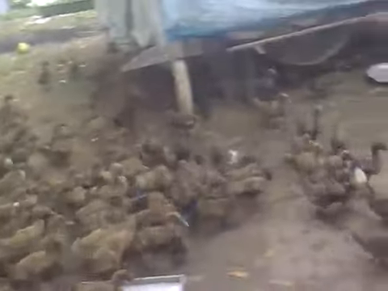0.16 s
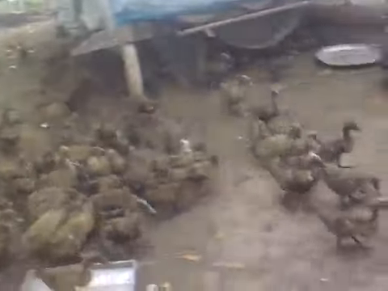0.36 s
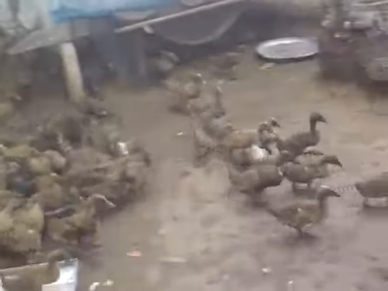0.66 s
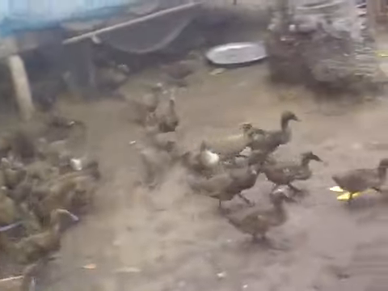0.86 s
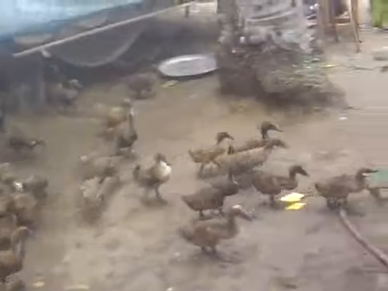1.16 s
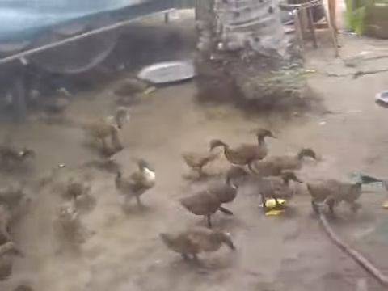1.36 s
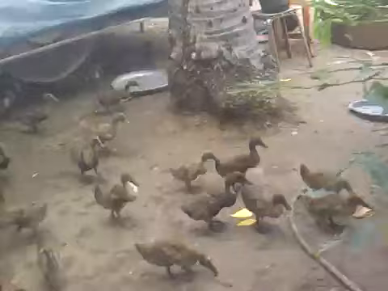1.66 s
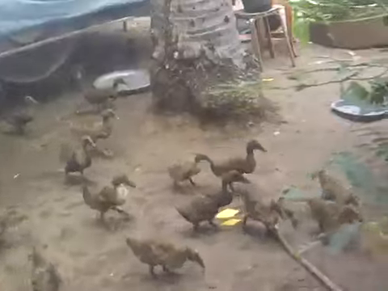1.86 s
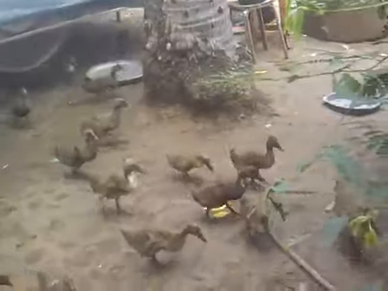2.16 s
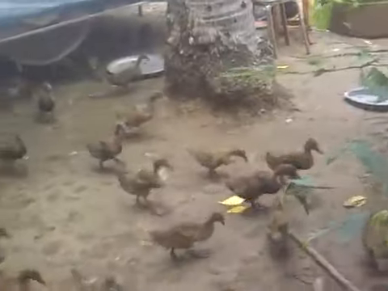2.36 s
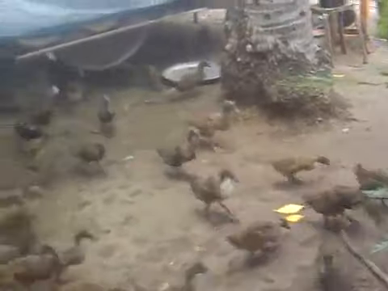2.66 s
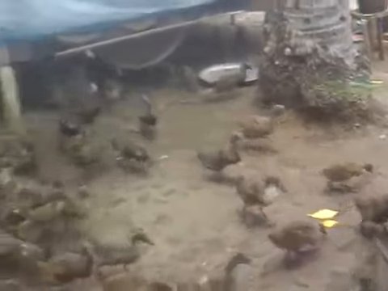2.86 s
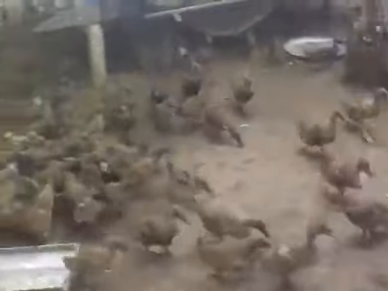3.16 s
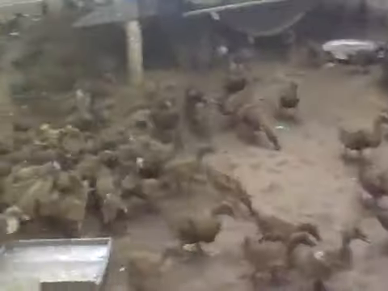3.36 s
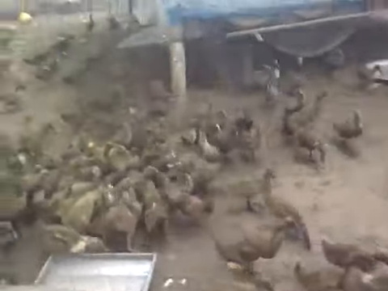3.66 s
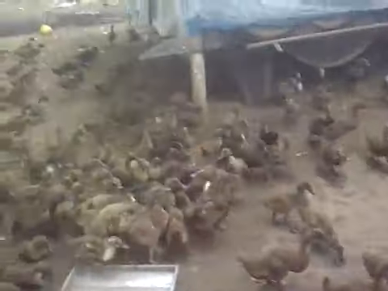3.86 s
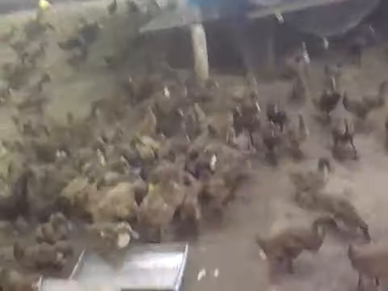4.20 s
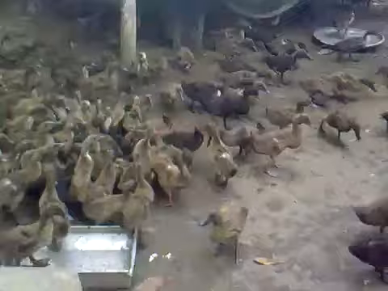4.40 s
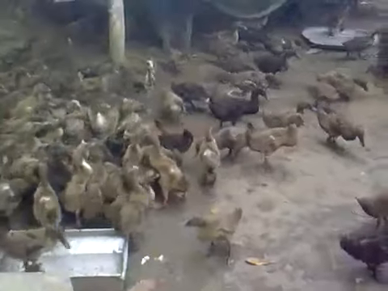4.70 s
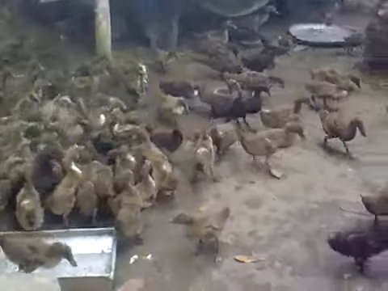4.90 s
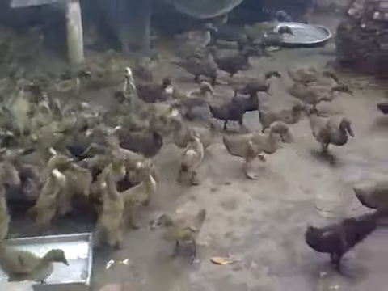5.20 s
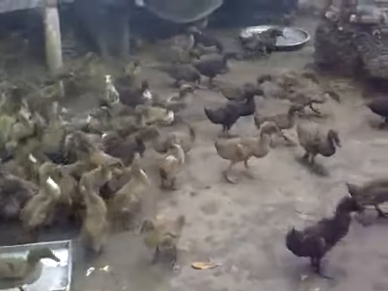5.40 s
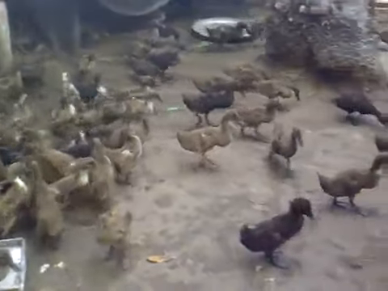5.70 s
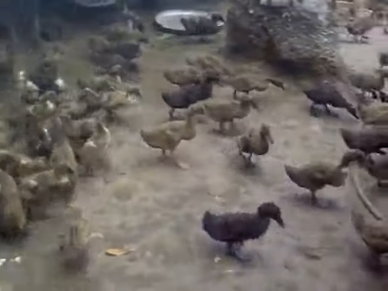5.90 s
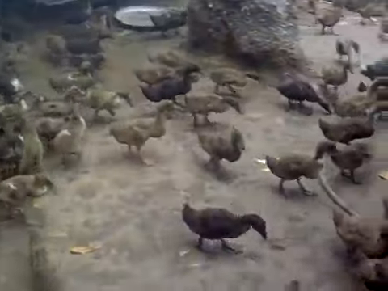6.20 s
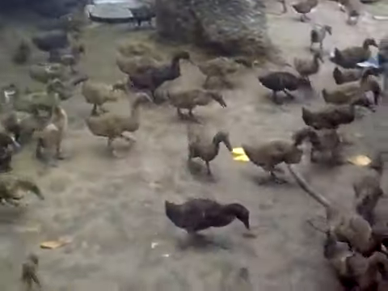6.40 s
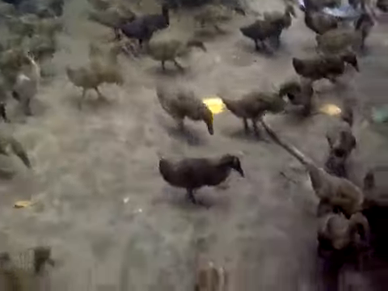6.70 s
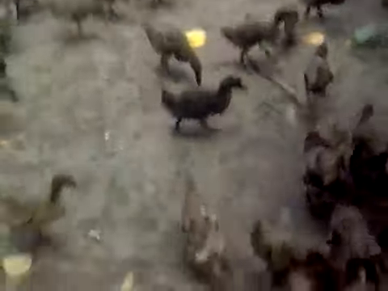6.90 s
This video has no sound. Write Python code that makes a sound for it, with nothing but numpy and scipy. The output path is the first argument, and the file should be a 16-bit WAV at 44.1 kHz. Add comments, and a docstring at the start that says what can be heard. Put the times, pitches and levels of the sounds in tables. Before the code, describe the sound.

Outdoors in a farmyard, a small microphone sits amid many ducklings peeping without pause, thin and reedy, around the upper-middle pitch range. Loud single peeps jump out, strongest between two and four seconds, with dull thumps on trays. The sound stutters, drops to nothing for an instant, and resumes softer and slightly thinner, with scattered peeps, bill ticks and one sharp clack past six seconds. Faint low rumble and yard noise underneath.

```python
"""A flock of young ducks crowds a farmyard, whistling short, mostly falling peeps near a small microphone.
The nearest peeps are placed one by one as reedy sines; a dense chorus of random ones lies behind them.
A soft broadband hiss rises and falls with their level; feet and bills tap trays and ground as short rings
of filtered noise. Echoes, yard noise, a low rumble and one brief rustle lie around them.
Midway the sound stutters, stops dead for about a fifth of a second and resumes with a quieter chorus."""
import sys
import numpy as np
from scipy import signal
from scipy.io import wavfile
from scipy.ndimage import uniform_filter1d

SR = 44100
rng = np.random.default_rng(int(sys.argv[2]) if len(sys.argv) > 2 else 0)


def materialize(psi):
    """Save the field psi as 16-bit PCM at rate SR to the path in sys.argv[1].

    A 1-D psi becomes a single channel; in a 2-D psi each row is a channel.
    """
    bounded = np.clip(np.atleast_2d(psi).T, -1, 1)
    quanta = np.round(bounded * 32767).astype(np.int16)
    wavfile.write(sys.argv[1], SR, quanta)


N = 310905
TIME = np.arange(N) / SR  # seconds

# The stutter and stop of the whole sound. Each row: time in seconds, gain in dB.
STOP = [(4.005, 0), (4.007, -24), (4.011, -24), (4.012, -10), (4.016, -10), (4.017, -26), (4.05, -70),
        (4.06, -120), (4.2295, -120), (4.2305, 0)]
RESUME_S = STOP[-1][0]

# Every pair of settings marked "before, after" holds one value for each side of the stop.
BILL_SCALE = 0.99, 0.858  # factor on the bill resonances: before, after


def gain_of(db):
    """Decibels to gain."""
    return 10 ** (np.asarray(db) / 20)


def evened(x):
    """Scales to rms 1."""
    return x / np.sqrt(np.mean(x ** 2) + 1e-20)


def add(mix, s, sound):
    """Mixes a sound in at time s, trimmed to the length of the mix."""
    at = round(s * SR)
    sound = sound[max(-at, 0):]
    part = mix[max(at, 0):][:len(sound)]
    part += sound[:len(part)]


def band(x, lo_hz, hi_hz):
    """Band-pass."""
    sos = signal.butter(2, [lo_hz, min(hi_hz, SR / 2 - 99)], "bandpass", fs=SR, output="sos")
    return signal.sosfilt(sos, x)


def wander(count, size):
    """Smooth random curves of rms 1."""
    window = np.hanning(420)
    return [evened(signal.oaconvolve(v, window, "same")) for v in rng.standard_normal((count, size))]


def peep(ms, start_hz, mid_hz, end_hz, db, hoarse, reedy_db=0, bill_scale=1):
    """A syrinx whistle: near sine on an arched pitch that sags as the breath runs out."""
    # Throat and bill resonances that let out the second and third harmonic.
    # Each row: centre in Hz before scaling, width in Hz.
    resonances = [(5450, 1220), (7300, 3300)]
    overtones_db = -21.5, -33  # second, third harmonic, before reediness and resonance
    overtone_spread_db = 2.8  # from peep to peep
    wobble_share, flutter_db, rasp_db = .007, 2.0, 4.0  # rms unsteadiness of pitch, level, overtones

    u = np.linspace(-.12, 1.15, int(1.27 * ms * SR / 1000))  # share of the length, with lead-in and tail
    arch = np.polyval(np.polyfit([0, .5, 1], [start_hz, mid_hz, end_hz], deg=2), np.minimum(u, 1))
    hz = arch - 2500 * np.maximum(u - 1, 0)
    wobble, flutter, rasp = wander(count=3, size=len(u))
    cycles = np.cumsum(hz * (1 + wobble_share * wobble)) / SR
    phase = 2 * np.pi * (cycles + rng.random())

    spread_db = overtone_spread_db * rng.standard_normal(2)
    strengths = gain_of(np.add(overtones_db, reedy_db + spread_db))
    overtones = 0
    for strength, k, (centre_hz, width_hz) in zip(strengths, (2, 3), resonances):
        passed = np.exp(-((k * hz - bill_scale * centre_hz) / width_hz) ** 2)
        overtones = overtones + strength * passed * np.sin(k * phase)
    tone = np.sin(phase) + gain_of(rasp_db * rasp) * overtones

    swell = np.sin(np.pi * np.linspace(0, 1, len(u)) ** 1.03) ** 0.64  # peaks just past the middle
    rough = np.convolve(rng.standard_normal(len(u)), np.hanning(80), "same")
    grain = 1 + hoarse * evened(rough)
    level = np.sqrt(2 / (1 + hoarse ** 2)) * gain_of(db + flutter_db * flutter)
    return level * swell * grain * tone


def near_ducks():
    """The peeps close to the microphone; soft and high ones are the reediest, low ones the hoarsest."""
    # Each row: start in seconds, length in ms, pitch in Hz at the middle,
    # downward slide in % of the pitch (negative rises), level in dB.
    near_peeps = [(0.0, 22.3, 2576, 1, -24), (0.138, 24.5, 2448, 8.5, -19.5), (0.367, 57, 2320, 16, -28.5),
                  (0.566, 82, 2567, 12.5, -35), (0.679, 49, 2490, -3, -26.5), (0.71, 45, 3386, 18, -41),
                  (0.781, 80, 2645, 2.5, -37), (0.835, 43, 2880, 6, -40), (0.917, 17.5, 2676, 5, -26),
                  (0.934, 75, 2392, 16.5, -17.5), (1.02, 53, 2683, -5, -32.5),
                  (1.058, 75, 2836, 5.5, -37.5), (1.157, 17, 1240, 36, -40.5), (1.184, 40, 2550, 13.5, -31),
                  (1.22, 31, 3310, 18.5, -39), (1.239, 55, 2310, 5.5, -17), (1.304, 59, 2540, 5, -24.5),
                  (1.316, 24, 1170, 41, -42), (1.374, 79, 2800, 5.5, -34), (1.455, 46, 3060, -10, -40.5),
                  (1.474, 60, 1863, 2, -39.5), (1.564, 72, 2690, -5.5, -28), (1.756, 32, 2630, 14, -39),
                  (1.778, 54, 2046, 8, -19), (1.865, 28, 2250, 9, -40), (1.912, 16, 3600, 30, -45),
                  (1.955, 33, 3570, 59, -48), (1.962, 39, 2620, 12.5, -30), (2.061, 63, 2276, 12.5, -29),
                  (2.07, 51, 2760, -0.5, -32), (2.126, 22.5, 2664, 10, -26.5), (2.156, 23, 1167, 27, -36.5),
                  (2.211, 25, 2310, -1.5, -36), (2.251, 22, 2160, 4, -26.5), (2.281, 85, 1960, 6.5, -34),
                  (2.316, 42, 2390, 11, -10.5), (2.343, 26, 2553, 6, -21.5), (2.37, 14.8, 1137, 39, -33.5),
                  (2.373, 77, 2396, -10.5, -22.5), (2.49, 100, 2307, 11, -26.5),
                  (2.617, 27.4, 1430, 18, -36.5), (2.722, 59, 2300, 2, -15), (2.792, 45, 2480, -5, -25.5),
                  (2.812, 70, 1920, 3.5, -26), (2.84, 37, 2320, 1.5, -27), (2.973, 43.3, 2507, 12.5, -13),
                  (3.033, 48, 2126, -1, -30), (3.091, 88, 2085, 9, -20.5), (3.112, 25, 2460, 6.5, -23.5),
                  (3.243, 115, 2634, 3.5, -30), (3.377, 54, 2398, 10, -26), (3.452, 50, 2416, 1, -15.5),
                  (3.446, 74, 2056, 8, -22), (3.447, 150, 2600, 38, -27.5), (3.683, 61, 2610, 6, -23),
                  (3.747, 15, 2330, 5, -24), (3.787, 40, 2440, 14, -28), (3.95, 103, 2572, 14.5, -20),
                  (3.99, 14, 2472, 9, -14), (4.228, 46, 2230, 16.5, -35), (4.229, 39, 2590, 0.5, -42.5),
                  (4.231, 26, 3500, 11.5, -52.5), (4.35, 56, 2463, 20.5, -33), (4.45, 73, 1987, 9, -33),
                  (4.481, 66, 2835, 10.5, -41), (4.53, 42, 2410, 28, -43.5), (4.612, 56, 2238, 23.5, -31),
                  (4.641, 43, 2616, 6, -34.5), (4.711, 61, 2404, 10.5, -36), (4.775, 59, 2220, -2, -36.5),
                  (4.897, 57, 2300, 20, -36), (4.997, 65, 1973, 1.5, -28), (5.049, 52, 2550, 9.5, -37),
                  (5.297, 68, 2112, 2.5, -24.5), (5.328, 67, 2430, 5, -36), (5.66, 83, 2000, 2.5, -39.5),
                  (5.71, 40, 2350, 3.5, -38.5), (5.926, 35, 2280, 17.5, -24.5),
                  (6.065, 20, 2324, -3.5, -28), (6.164, 42.5, 2520, 9, -29.5), (6.2, 58, 2166, 12, -27.5),
                  (6.314, 60, 2885, 10.5, -42.5), (6.318, 50, 2175, 1, -37), (6.425, 26, 2243, 8.5, -35.5),
                  (6.508, 56, 2415, 20.5, -25.5), (6.612, 43, 2380, 9, -27.5),
                  (6.661, 18.7, 2076, 10.5, -23), (6.666, 48, 1380, 1.5, -39.5),
                  (6.681, 41, 2390, 6.5, -28.5), (6.689, 54, 2030, 3.5, -26.5),
                  (6.766, 19.4, 2790, 23, -36), (6.797, 32, 2450, 17, -26), (6.89, 59, 2850, 6, -44),
                  (6.892, 38, 2470, 7, -56), (6.893, 62, 1437, 32.5, -42.5), (6.95, 38, 2390, 3, -42),
                  (7.011, 21.2, 2230, 4.5, -24.5), (7.02, 42, 3080, -5, -40)]
    early_slide = 0.332  # share of the slide spent before the middle of a peep
    hoarse_usual, hoarse_low, low_hz = .08, .4, 1300  # share of grain, and below low_hz
    side_reedy_db = -1.5, 2  # overtone lift before, after

    out = np.zeros(N)
    for s, ms, hz, slide, db in near_peeps:
        pitches = hz * (1 + slide / 100 * np.array([early_slide, 0, early_slide - 1]))
        late = int(s > RESUME_S - .01)
        hoarse = hoarse_low if hz < low_hz else hoarse_usual
        reedy_db = side_reedy_db[late] - .6 * (db + 35) + np.clip((hz - 2450) / 35, -3, 9)
        add(out, s - .12 * ms / 1000, peep(ms, *pitches, db, hoarse, reedy_db, BILL_SCALE[late] ** .5))
    return out


def crowd():
    """Many farther ducks peep at random moments, each with its own pitch and slide; some fall steeply."""
    # Level of the chorus before it joins in with the near ducks. Each row: time in seconds, level in dB.
    chorus_level = [(0.03, -33), (0.6, -33.5), (1.2, -36), (1.7, -37), (2.1, -33.5), (2.4, -35), (2.9, -32),
                    (3.399, -36), (3.95, -34), (4.3, -44), (4.66, -40.5), (5.2, -39), (5.55, -41.5),
                    (5.74, -40.5), (5.85, -40), (6.2, -35), (6.66, -37), (7.0, -37)]
    peeps_per_s, hoarse = 175, .14
    usual_hz, pitch_spread = (2415, 2283), (.11, .11)  # before, after; spread as a share of pitch
    side_reedy_db = 0.5, 6.5  # overtone lift before, after

    out = np.zeros(N)
    draws = rng.standard_normal((int(peeps_per_s * N / SR), 5))
    starts = rng.uniform(-0.054, N / SR, len(draws))
    for at, (pitch, bend, fall, size, length) in zip(starts, draws):
        late = int(at > RESUME_S)
        hz = usual_hz[late] * np.exp(pitch_spread[late] * pitch)
        start_hz = hz * (.97 + 0.04046 * np.exp(0.597 * np.minimum(bend, 2.2)))
        end_hz = hz * (1 - 0.1255 * np.exp(0.45 * np.minimum(fall, 1.5)))
        db = 4.8 * size - 1.5 * pitch ** 2  # pitches far from the usual are softer
        ms = 38 * np.exp(.35 * length)
        add(out, at, peep(ms, start_hz, hz, end_hz, db, hoarse, side_reedy_db[late], BILL_SCALE[late]))
    loudness = np.sqrt(uniform_filter1d(out ** 2, 6000))
    steadier = evened(out / loudness ** 0.28)  # partly levels out chance bunching
    s, level_db = np.transpose(chorus_level)
    return steadier * gain_of(np.interp(TIME, s, level_db))


def joining_in(near):
    """The crowd calls louder whenever the nearest ducks do: extra dB over time."""
    db_per_db, above_db, over_s = 0.3, -42.5, 0.08  # slope, soft threshold, smoothing window
    window = np.hanning(int(over_s * SR))
    power = abs(signal.oaconvolve(near ** 2, window / window.sum(), "same"))
    return db_per_db * 10 * np.log10(1 + power / gain_of(above_db) ** 2)


def following_hiss(voices):
    """Soft broadband hiss that rises and falls with the level of the whistles."""
    swell = np.sqrt(abs(signal.oaconvolve(voices ** 2, np.hanning(900) / 450, "same")))
    hiss = band(band(rng.standard_normal(N), 900, 5800), 900, 5800)
    return swell ** .85 * gain_of(-26.5) * evened(hiss)


def knocks():
    """Feet and bills: a push and a broad ring for each knock, a snap for each tick, a patter of small taps."""
    # Knocks on trays and ground. Each row: start in seconds, rough peak in dB, centre in Hz,
    # time to fall by 60 dB in seconds.
    thuds = [(0.406, -35.5, 520, 0.27), (0.462, -28, 664, 0.033), (1.62, -37, 940, 0.15),
             (2.709, -35.5, 596, 0.45), (2.796, -13, 374, 0.037), (2.799, -26, 73, 0.055),
             (2.814, -25, 940, 0.032), (2.945, -31, 895, 0.056), (3.007, -19.5, 805, 0.037),
             (3.491, -30.5, 730, 0.23), (3.886, -32.5, 734, 0.32), (3.932, -34, 123, 0.099),
             (4.622, -25.5, 1090, 0.095), (5.428, -19.5, 2260, 0.013), (5.802, -27, 806, 0.17),
             (5.897, -21.5, 750, 0.038), (6.263, -11.5, 2220, 0.04), (5.83, -35, 330, 0.16),
             (6.267, -34, 330, 0.19)]
    # Dry ticks of bills. Each row: start in seconds, rough peak in dB.
    bill_ticks = [(1.0164, -36), (1.422, -37), (2.797, -27), (3.725, -35.5), (4.463, -35), (5.386, -35),
                  (5.8705, -28.5), (5.898, -30), (5.948, -26.5), (6.265, -20.5), (6.42, -27), (6.787, -26),
                  (6.8064, -30), (6.893, -27)]
    thud_crest_db, tick_crest_db = 8, 5.5  # allowance for the peak over the rms of the ring
    tap_hz = 1000, 4000, 6460  # small taps come dull, middling or bright
    taps_per_s = 110

    out, t = np.zeros(N), np.arange(8000) / SR
    for s, db, hz, t60 in thuds:
        push = rng.standard_normal(len(t)) + 1.1 * np.exp(-t * hz * 0.74)
        ring = evened(band(push, hz * 0.57, hz * 1.79))
        add(out, s, gain_of(db - thud_crest_db - 60 * t / t60) * ring)
    for s, db in bill_ticks:
        snap = band(band(rng.standard_normal(len(t)), 2100, 9700), 1500, 8200)
        add(out, s, gain_of(db - tick_crest_db - 60 * t / 0.015) * evened(snap))

    strength = gain_of(7 * np.minimum(rng.exponential(1, N), 3))
    taps = strength * (rng.random(N) < taps_per_s / SR)
    kind = rng.integers(0, len(tap_hz), N)
    burst = rng.standard_normal(600) * gain_of(-60 * t[:600] / .012)
    patter = np.zeros(N)
    for k, hz in enumerate(tap_hz):
        tap = evened(band(band(burst, hz / 1.6, hz * 1.6), hz / 1.6, hz * 1.6))
        patter += signal.oaconvolve(taps * (kind == k), tap)[:N]
    return out + gain_of(-61) * evened(patter)


def echoes(x, t60=0.078):
    """Ground, roof and trunks throw back a short scatter: sparse taps of random sign, dying away."""
    taps, at = np.zeros(SR // 3), np.arange(150, SR // 3 - 40, 40)
    signs = rng.choice([-1., 1.], len(at))
    taps[at + rng.integers(0, 40, len(at))] = signs * gain_of(-60 * at / SR / t60)
    return signal.fftconvolve(x, taps / np.linalg.norm(taps))[:N]


def yard_noise():
    """Faint noise of the yard: random short-time spectra with drifting patches."""
    # Relative spectrum of the yard. Each row: frequency in Hz, density in dB per Hz.
    spectrum = [(18, -60), (30, -3), (103, -24.5), (178, -12.5), (564, -19), (1140, -19.5), (1700, -18.5),
                (2300, -17), (3400, -18.5), (5090, -25), (6280, -30), (14500, -37.5), (15700, -38)]
    level_db, patchy_db = (-48.5, -48), 2.4  # before, after; rms unevenness of the patches

    frames, hz = N // 256 + 5, np.fft.rfftfreq(1024, 1 / SR)
    real, imaginary, patches = rng.standard_normal((frames, 513, 3)).T
    patches = evened(uniform_filter1d(uniform_filter1d(patches, 12, 0), 12, 1))
    f, db = np.transpose(spectrum)
    shape_db = np.interp(np.log(hz + 1), np.log(f), db)[:, None]
    spectra = (real + 1j * imaginary) * gain_of(shape_db + patchy_db * patches)
    noise = signal.istft(spectra, nperseg=1024, noverlap=768)[1][:N]
    return gain_of(np.where(TIME < RESUME_S, *level_db)) * evened(noise)


def rumble():
    """A low, lumpy murmur of no clear source: narrow-band noise of drifting level."""
    centre_hz, usual_db = 94, (-59.5, -64)  # usual level before, after
    lumps = evened(uniform_filter1d(rng.standard_normal(N), 2500))
    level_db = np.where(TIME < RESUME_S, *usual_db) + 4.1 * lumps
    murmur = band(rng.standard_normal(N), centre_hz * 0.884, centre_hz * 1.21)
    return gain_of(level_db) * evened(murmur)


def rustle():
    """A bright rustle close by, just before the stop: grainy treble hiss."""
    # Each row: time in seconds, level in dB.
    rustle_level = [(3.901, -88), (3.913, -46.5), (3.951, -47.5), (4.023, -35.5)]
    s, db = np.transpose(rustle_level)
    grain_db = 0.85 * wander(count=1, size=N)[0]
    hiss = band(band(rng.standard_normal(N), 3820, 11000), 3780, 13000)
    return gain_of(np.interp(TIME, s, db, right=-120) + grain_db) * evened(hiss)


def scene():
    """Ducks, knocks and their echoes over the yard."""
    nearest = near_ducks()
    voices = nearest + crowd() * gain_of(joining_in(nearest))
    flock = voices + following_hiss(voices) + knocks()
    return (flock + gain_of(-11) * echoes(flock) + yard_noise() + rumble() + rustle())[None]


def record(dry):
    """The stop midway, then a steep limit on the treble."""
    edge_hz = 15820
    s, db = np.transpose(STOP)
    cut = dry * gain_of(np.interp(TIME, s, db))
    lowpass = signal.firwin(511, edge_hz, window=("kaiser", 9), fs=SR)
    return signal.oaconvolve(cut, lowpass[None], "same")


dry = scene()
out = record(dry)
materialize(out)
```